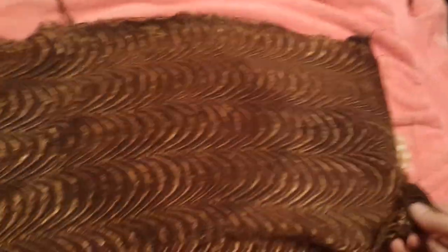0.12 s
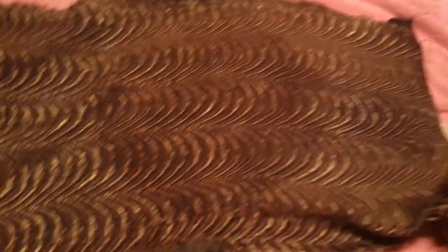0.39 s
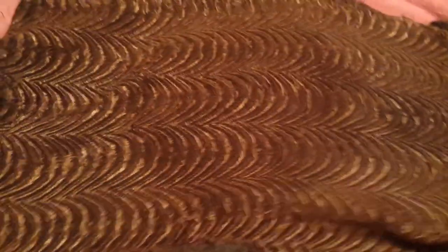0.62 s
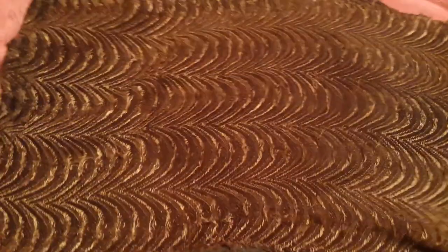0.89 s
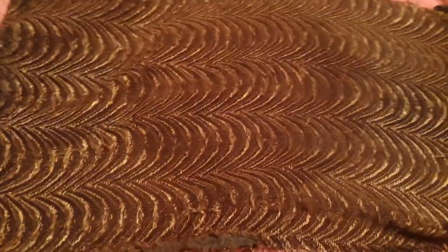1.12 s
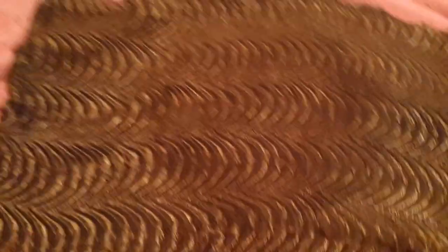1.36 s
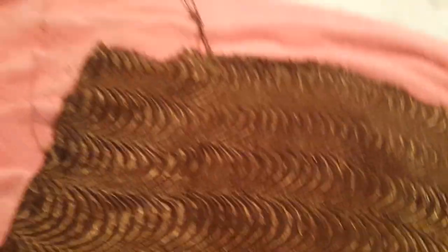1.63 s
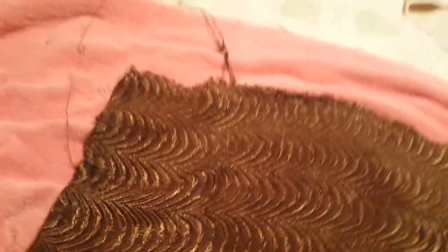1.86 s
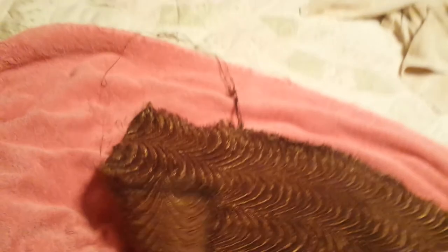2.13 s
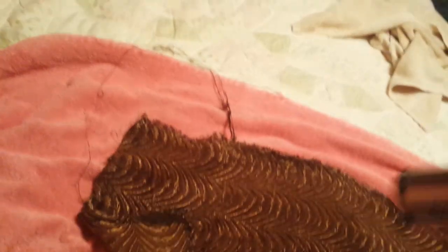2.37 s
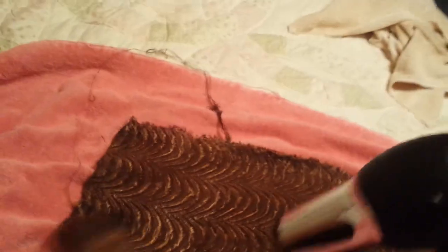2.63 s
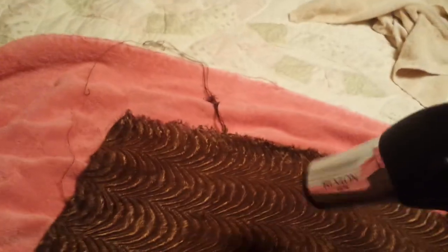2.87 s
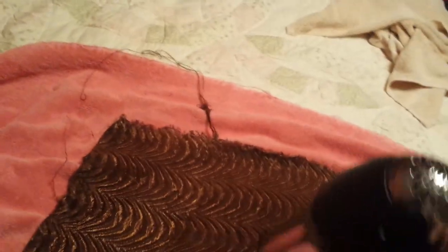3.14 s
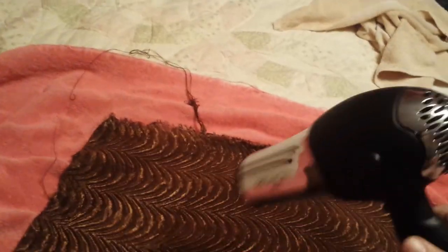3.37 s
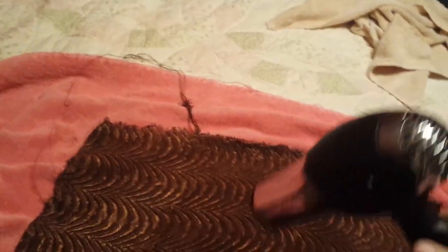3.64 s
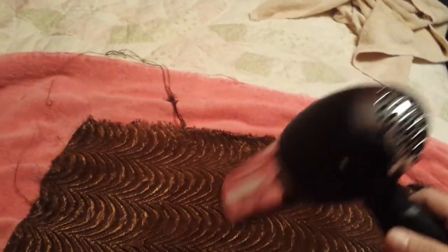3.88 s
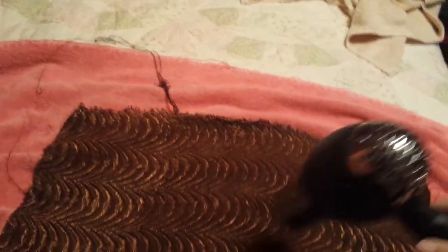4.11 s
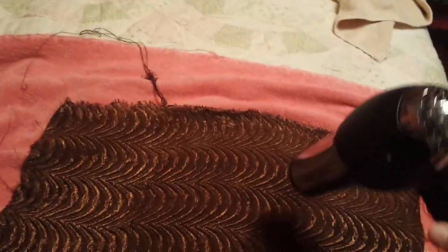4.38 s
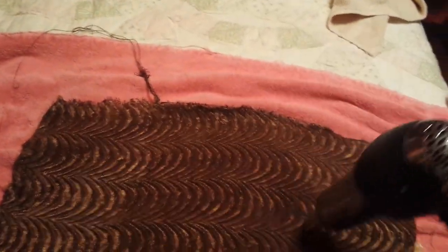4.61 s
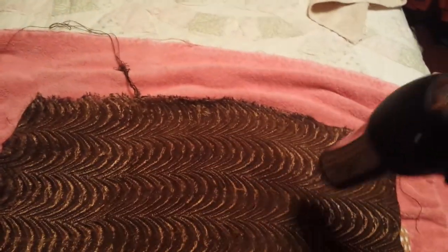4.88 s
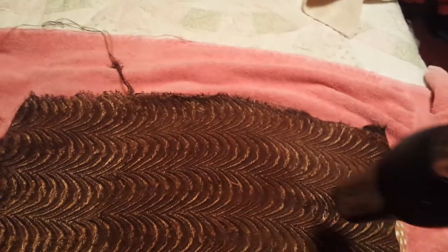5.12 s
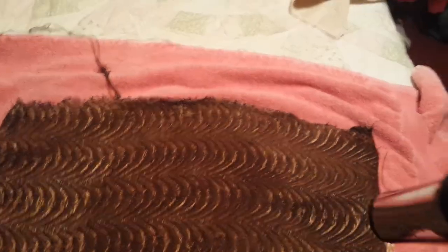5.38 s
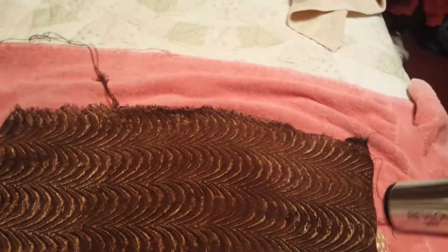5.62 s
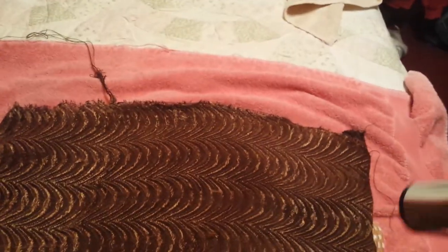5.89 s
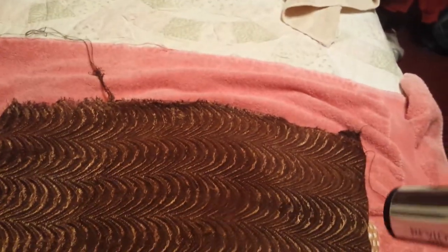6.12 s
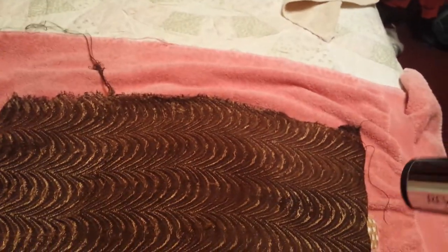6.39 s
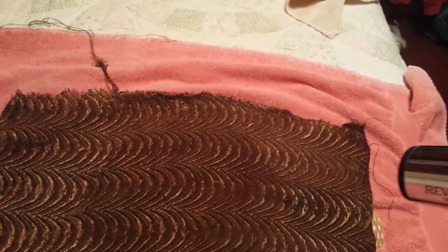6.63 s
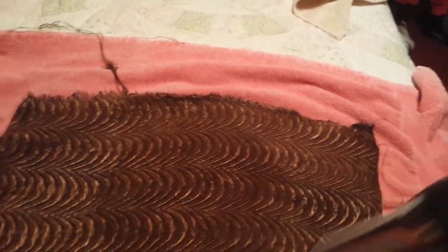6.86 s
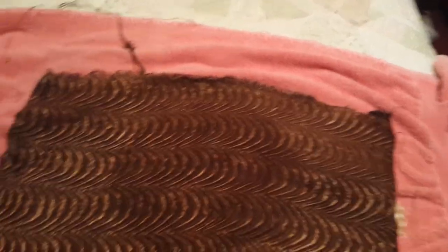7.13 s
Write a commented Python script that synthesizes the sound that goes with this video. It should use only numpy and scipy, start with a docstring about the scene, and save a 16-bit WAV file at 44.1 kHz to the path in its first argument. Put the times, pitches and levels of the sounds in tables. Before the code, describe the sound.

Steady rushing air and a thin motor whine from a nearby hair dryer, changing colour as it is carried, finally coasting down.

```python
"""A handheld hair dryer blows over cloth on a bed, close to a phone with two microphone ports.
It starts behind the phone: shaped noise makes the rushing air, three sines the blade whine, with an echo off the bed.
Faint room noise and a deep low rumble lie below, and short bumps hit single ports in the first 2.4 s.
Around 2 s it is carried round to the phone's other side, which changes its colour.
After 5.1 s it speeds up a little; at 6.52 s it is switched off and coasts down, and the rumble is plainer."""
import sys
import numpy as np
from scipy import signal
from scipy.fft import rfft, irfft
from scipy.io import wavfile
from scipy.ndimage import uniform_filter1d, map_coordinates

SR = 44100
rng = np.random.default_rng(int(sys.argv[2]) if len(sys.argv) > 2 else 0)


def volts(x):
    """Linear amplitude factor 10**(x/20) for a level x in dB, scalar or array-like."""
    e = np.asarray(x, float) / 20
    return 10 ** e


def waveform_to_disk(signal):
    """Save audio, clipped to [-1, 1], as 16-bit WAV at the path in sys.argv[1]."""
    frames = np.transpose(np.atleast_2d(signal))
    scaled = np.clip(frames, -1, 1) * 32767
    samples = np.round(scaled).astype(np.int16)
    wavfile.write(sys.argv[1], SR, samples)


N = 319721  # length in samples
FRAME, HOP = 1024, 256  # samples in each short spectrum, and between one and the next
FLOW_LAG_S = 0.036  # the air follows the fan this much later


def evened(x):
    """Scales each row to rms 1."""
    return x / np.sqrt(np.mean(abs(x) ** 2, axis=-1, keepdims=True) + 1e-20)


def along(rows, at):
    """Reads every column of a table at the given places of its first column."""
    first, *columns = np.transpose(rows)
    return np.array([np.interp(at, first, c) for c in columns])


def over_hz(rows, hz):
    """Reads a table the same way, on a log frequency axis."""
    rows = np.array(rows, float)
    log_rows = np.column_stack([np.log(rows[:, 0]), rows[:, 1:]])
    return along(log_rows, np.log(hz + 1))


def patches(shape, bins, frames):
    """Random field over frequency and time, smooth over so many bins and frames."""
    field = uniform_filter1d(rng.standard_normal(shape), max(round(bins), 1), -2)
    for _ in range(2):
        field = uniform_filter1d(field, round(frames), -1)
    return field / field.std()


# How the dryer is carried: start_s, place (0-5 in the list of colours in paths()),
# treble_lift_db (as the outlet turns to the phone), left_level_db, right_level_db, left_lag_ms (behind right)
MOTION = [(0, 0, 0, -17.5, -18, .2), (.5, 0, .2, -14, -14, 0.17), (.95, -0.02, .8, -16, -14.5, .17),
          (1.4, 0.22, -1, -17.5, -16, 0.12), (1.78, 0.18, -2.5, -15.5, -15, .11),
          (1.93, .5, -3, -14.5, -13, .1), (2.04, 2.1, 3, -12, -14, -0.26), (2.36, 2.2, -4, -12, -11, -0.43),
          (2.42, 2, 1, -14.5, -16, -0.38), (2.8, 2, -2, -12.5, -14, -0.27),
          (3.2, 2.5, 1.8, -13, -14, -0.18), (3.5, 2.5, 1.5, -13, -12.5, -0.16),
          (4.05, 3.5, 2, -13.5, -12.5, -0.15), (4.16, 4, 3, -14.5, -12.5, -0.13),
          (4.3, 3.5, 3.5, -13.5, -13, -0.165), (4.75, 4, 2.2, -12.5, -14, -0.21),
          (5.15, 3.5, 4, -12.5, -13, -0.22), (5.45, 5, -1.3, -12.5, -15, -0.32),
          (5.92, 5, -3.8, -12.5, -15, -0.37), (6.5, 5, -3.5, -13, -15, -0.33),
          (6.85, 5, -8, -13, -13.5, -0.33), (7.25, 5, 6, -11, -11.5, -0.19)]
DULL_AT = 0.4  # share of full speed where the dryer sounds nearly stopped


def holds(t):
    """Weights of the seven colours over time; the last one takes over as the fan slows."""
    slowed = np.clip((1 - coast(t - FLOW_LAG_S)) / (1 - DULL_AT), 0, 1)
    place = np.clip(along(MOTION, t)[0], 0, 5) + slowed ** 2
    return np.maximum(1 - abs(place - np.arange(7)[:, None]), 0)


# Colour of the rushing air for each way the dryer is held; only the shape counts, as paths() evens the power.
# Columns of all seven: pitch_hz, left_db, right_db (per Hz)
BEHIND = [(206, -19, -21), (640, -1, -4), (750, 2, -1), (867, 0.5, -9.5), (1075, -13, -16),
          (1350, -16.5, -14.5), (1750, -8.5, -8.5), (2410, -18.5, -14), (2990, -19, -10),
          (3830, -17, -23.5), (4500, -19.5, -17.5), (5840, -12, -13.5), (7800, -23, -19), (12300, -55, -27)]
PASSING = [(200, -20.3, -21), (637, -4, -11), (800, -7, -4), (905, -6, 11), (990, -12, -5), (1400, -9, -7),
           (1620, -10, -2), (2000, -14, -7), (2120, 3, -16), (2660, -17, -8.5), (4650, -9, -13),
           (6100, 1, -7), (8000, -14, -16), (12500, -29, -14)]
RAISED = [(205, -19, -21), (350, -9, -10.5), (620, -13.5, -11.5), (813, 1.5, -0.5), (1370, -17, -6),
          (1630, -4, 1.5), (2200, -5, -11.5), (2410, -16, -5.5), (2900, -5.5, -14), (3430, -10.5, -11.5),
          (6400, -2.5, -14), (7410, -11, -11.5), (11240, -22.5, -18), (12600, -21.5, -33)]
AIMED_DOWN = [(205, -16.5, -20), (390, -10.5, -14), (604, -10, -20), (778, -8, 2), (1140, -14.5, -13.5),
              (1440, -7, -10), (1655, -3, 3), (2450, -12, -14.5), (2920, -8, -3.5), (4700, -7, -15.5),
              (6000, -3, -21), (7750, -13, -15.5), (11300, -25, -17), (12800, -22, -31)]
SWEPT_ASIDE = [(200, -20, -21), (442, -8, -7.5), (600, -11, -9.5), (810, -5.5, -2), (1050, -13, -15),
               (1250, -8, -9.5), (1800, -6.5, 1), (2450, -15, -11), (3080, -6, -6), (3520, -14, -8.5),
               (6260, -5, -14), (7410, -12, -12.5), (11100, -26.5, -18), (12900, -26, -28)]
LEVELLED = [(196, -21, -22.5), (313, -12.5, -9.5), (550, -9, -11.5), (780, 1, -0.5), (970, -8, -1.5),
            (1080, -8.5, -12.5), (1380, -7, -9.5), (1640, -5.5, -5), (2560, -11.5, -6.5), (2810, 0.5, 0.5),
            (3300, -11.5, -11), (6140, -2, -13), (8100, -11.5, -7.5), (12700, -17, -20.5)]
NEARLY_STOPPED = [(200, -6.5, -15), (286, 3, -4), (565, -0.5, 2), (716, 4, 1), (1130, -14, -12),
                  (1650, -11, -11), (2264, -20, -26), (3050, -21, -14), (3650, -20, -25), (5200, -17, -21),
                  (6300, -7.5, -20), (7240, -22, -21), (12500, -44, -35)]
# Echo off the bed, one row per colour above: left_delay_ms, left_share, right_delay_ms, right_share (both 0-1)
BED = [(0.805, 0.21, 0.57, 0.37), (0.48, 0.1, 0.77, 0.11), (0.738, 0.12, 0.714, 0.21),
       (0.488, 0.33, 0.57, 0.067), (0.494, .39, 0.43, 0.45), (0.499, 0.42, 0.52, 0.054),
       (.46, .3, .85, .04)]
# The ports' own colour, with low cut and a cavity ring: pitch_hz, left_db, right_db
PORTS = [(60, -24, -22), (100, -13.5, -10.5), (140, 0, 1.5), (190, -0.5, -0.5), (5140, 0.5, 0),
         (5200, -5.5, -2), (5670, 4, -8), (5940, -1, 1.5), (6400, 2, -2.5), (6840, -1.5, 0.5),
         (8140, -1, -3), (12560, -2.5, 0), (15200, -10.5, -19.5)]
# How alike the ports hear the air: pitch_hz, alike_share (0-1), lag_factor (times the lag in MOTION)
SAME = [(60, 0.1, .9), (150, 0.98, 0.53), (500, 0.95, 0.38), (880, 0.8, 0.44), (1400, 0.69, 0.79),
        (2070, 0.58, 0.89), (3980, 0.3, 0.99), (6040, 0.58, 1.103), (9000, 0.18, 1.155), (14000, 0, 0.91)]


def paths(hz, t, ripple_db=2.43, gust_db=0.83, cloth_hz=8000, beam_hz=7500):
    """Complex gain from the dryer to each port: ports x bins x frames, mean power 1 in every frame."""
    ways = BEHIND, PASSING, RAISED, AIMED_DOWN, SWEPT_ASIDE, LEVELLED, NEARLY_STOPPED
    colours = np.array([over_hz(c, hz) for c in ways])
    blend = holds(t)
    _, lift_db, _, _, lag_ms = along(MOTION, t)
    hz_column = hz[:, None]

    db = np.einsum("kcf,kt->cft", colours, blend) + over_hz(PORTS, hz)[:, :, None]
    db += lift_db / (1 + (beam_hz / (hz_column + 1)) ** 4)  # only short waves are beamed
    db += ripple_db * patches(db.shape, 2.6, 50)  # walls and bedding: narrow ripples that drift slowly
    db += gust_db * patches(db.shape[1:], 120, 8)  # unsteady flow over wide bands

    bed = np.transpose(BED) @ blend
    delay_s = bed[0::2, None] / 1000
    returned = bed[1::2, None] / (1 + (hz_column / cloth_hz) ** 2)  # cloth swallows the treble
    echo = 1 + returned * np.exp(-2j * np.pi * hz_column * delay_s)
    gain = volts(db) * echo

    lag_s = over_hz(SAME, hz)[1][:, None] * lag_ms / 1000
    gain[0] *= np.exp(-2j * np.pi * hz_column * lag_s)
    return gain / np.sqrt(np.mean(abs(gain) ** 2, axis=1, keepdims=True))


def air(gain, hz):
    """Turbulent flow: noise, partly shared by the ports and partly scattered by the room."""
    a, b, c, d = rng.standard_normal((gain.shape[2], len(hz), 4)).T
    shared, scattered = a + 1j * b, c + 1j * d
    same = np.clip(over_hz(SAME, hz)[0], 0, 1)[:, None]
    right = same * shared + np.sqrt(1 - same ** 2) * scattered
    spectra = np.array([shared, right]) * gain
    sound = signal.istft(spectra, nperseg=FRAME, noverlap=FRAME - HOP)[1]
    return evened(sound[:, :N])


# Running speed, before the speed-up and the coasting: start_s, pitch_hz (blade passes a second)
SPEED = [(0, 1165), (2.1, 1167), (2.55, 1170), (2.85, 1175.5), (3.1, 1172.5), (5.0, 1169.5), (5.1, 1171)]
SPEED_UP_S, SPEED_UP_HZ, SETTLE_S = 5.11, 42.5, 0.15  # from then on the motor runs faster and settles


def blade_hz(t):
    """Blade passes a second: running, speeding up, coasting."""
    up = 1 - np.exp(-np.maximum(t - SPEED_UP_S, 0) / SETTLE_S)
    return (along(SPEED, t)[0] + SPEED_UP_HZ * up) * coast(t)


# Whine, one row per colour in paths(), before housing ring and waver:
# tone_1_db, tone_2_db, tone_3_db (multiples 1-3 of the blade tone, over 1 Hz of the air beside them)
WHINE = [(21, 11, 21.6), (23.8, 18, 26), (22.2, 25.6, 18.6), (22, 28, 14), (24, 20, 16), (13.8, 26.1, 14),
         (8, 17.5, 19)]
HOUSING_HZ, HOUSING_WIDTH_HZ, HOUSING_DB = 730, 78, 16.5  # the housing sings along near its own pitch


def whine(gain, waver_db=3.3, wobble_hz=0.9):
    """Blade tone and two multiples, carried by the same paths as the air."""
    t = np.arange(N) / SR
    wobble = wobble_hz * patches((1, N), bins=1, frames=2500)[0]
    hz = blade_hz(t) + wobble
    over_db = np.transpose(WHINE) @ holds(t)
    turns = np.cumsum(hz) / SR
    out = np.zeros((2, N))
    for k, db in enumerate(over_db, 1):
        at = [k * hz * FRAME / SR, np.arange(N) / HOP]  # bin and frame of the tone
        path = np.array([map_coordinates(g, at, order=1) for g in gain])
        ring_db = HOUSING_DB / (1 + ((k * hz - HOUSING_HZ) / HOUSING_WIDTH_HZ) ** 2)
        waver = patches((1, N), bins=1, frames=3000) * coast(t)  # steadier as the flow calms
        tone = (path * np.exp(2j * np.pi * k * turns)).real
        out += tone * volts(db + ring_db + waver_db * waver)
    return out * 2 / np.sqrt(SR)  # 1 Hz of unit noise spread to SR / 2, as a sine height


# Quiet of the room and hiss of the microphones: pitch_hz, left_db, right_db (per Hz)
ROOM = [(50, -115, -115), (120, -93, -88), (300, -79, -77), (750, -80, -83), (1500, -98, -89),
        (4000, -94, -96), (7800, -101, -96), (10000, -102, -101), (14000, -98, -90)]


def quiet():
    """Steady shaped noise, unrelated at the two ports."""
    hz = np.fft.rfftfreq(N, 1 / SR)
    spectra = rfft(rng.standard_normal((2, N))) * volts(over_hz(ROOM, hz))
    return irfft(spectra * np.sqrt(SR / 2), N)


# Deep low rumble, faint while the dryer runs, plainer as it coasts down; before its lumps: start_s, level_db
RUMBLE = [(0, -65), (1.9, -65), (2.3, -67), (6.65, -78), (6.75, -57), (7.25, -69)]


def low_rumble(top_hz=92, bottom_hz=45, lumps_db=1.7):
    """Deep noise between two cutoffs, unrelated at the two ports, with a lumpy level."""
    low = signal.lfilter(*signal.butter(4, top_hz, fs=SR), rng.standard_normal((2, N)))
    low = signal.lfilter(*signal.butter(2, bottom_hz, "high", fs=SR), low)
    level_db = along(RUMBLE, np.arange(N) / SR) + lumps_db * patches((2, N), bins=1, frames=2200)
    return volts(level_db) * evened(low)


# Gusts or fingers bumping one port: start_s, peak_db (before the limiter), length_ms, port (0 left, 1 right)
BUMPS = [(0.3065, -13, 2.6, 1), (0.767, 4.5, 1.9, 1), (1.228, -33, 2.9, 1), (1.65, -34, 3.7, 1),
         (1.83, -29, 3.5, 1), (2.3772, -16, 2.8, 0)]


def bumps():
    """A push on the membrane, then its slower swing back."""
    out = np.zeros((2, N))
    for start_s, peak_db, length_ms, port in BUMPS:
        u = np.arange(2000) / SR * 1000 / length_ms
        push = (1 - u) * np.exp(-u) * (1 - np.exp(-u / 0.057))
        out[round(port), round(start_s * SR):][:2000] += volts(peak_db) * push / push.max()
    return out


OFF_S, FRICTION_HZ, COAST_S = 6.52, 620, 0.958  # switch-off, blade rate where friction takes over, time scale


def coast(t):
    """Share of full speed left: air drag brakes the fan first, bearing friction below FRICTION_HZ."""
    full_hz = SPEED[-1][1] + SPEED_UP_HZ
    angle = np.arctan(full_hz / FRICTION_HZ) - np.maximum(t - OFF_S, 0) / COAST_S
    return np.tan(angle) * FRICTION_HZ / full_hz


def scene(flow_power=3.07, low_cut_hz=110):
    """Air and whine follow the dryer's distance and speed, with the deep bass cut away."""
    hz = np.fft.rfftfreq(FRAME, 1 / SR)
    gain = paths(hz, np.arange(N // HOP + 5) * HOP / SR)
    now = np.arange(N) / SR
    level = volts(along(MOTION, now)[2:4]) * coast(now - FLOW_LAG_S) ** flow_power
    low_cut = signal.butter(6, low_cut_hz, "high", fs=SR, output="sos")
    dryer = signal.sosfilt(low_cut, level * (air(gain, hz) + whine(gain)))
    return dryer + quiet() + low_rumble() + bumps()


def top_cut(x):
    """Nothing passes above the cut-off."""
    return signal.sosfilt(signal.butter(12, 14630, fs=SR, output="sos"), x)


def record(dry, ceiling_db=-3, recover_db_per_s=260):
    """A peak limiter ducks both channels at once and recovers steadily."""
    peak_db = 20 * np.log10(abs(dry).max(0) + 1e-9)
    fall = np.arange(N) * recover_db_per_s / SR
    held_db = np.maximum.accumulate(peak_db + fall) - fall  # latest peaks, sinking steadily
    over_db = np.maximum(held_db - ceiling_db, 0)
    limited = dry / volts(uniform_filter1d(over_db, size=120))
    return top_cut(limited)


dry = scene()
out = record(dry)
waveform_to_disk(out)
```